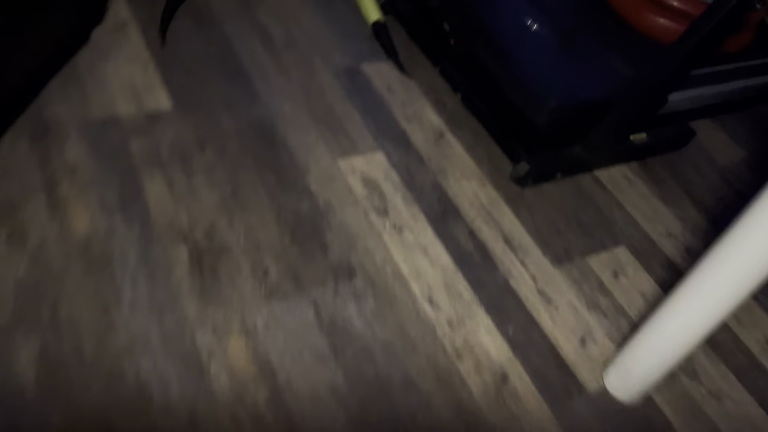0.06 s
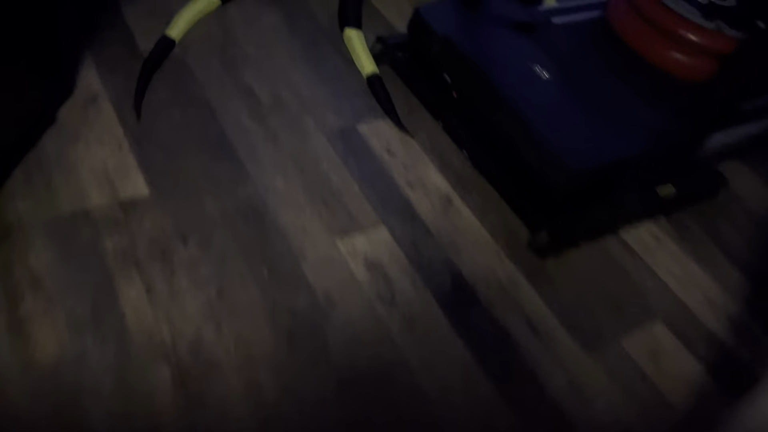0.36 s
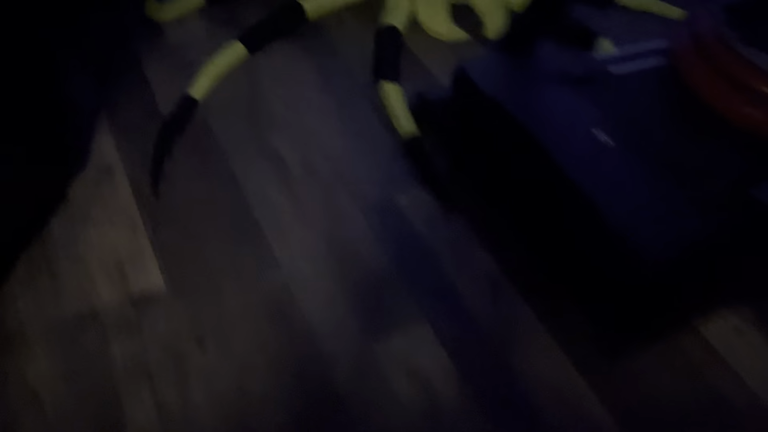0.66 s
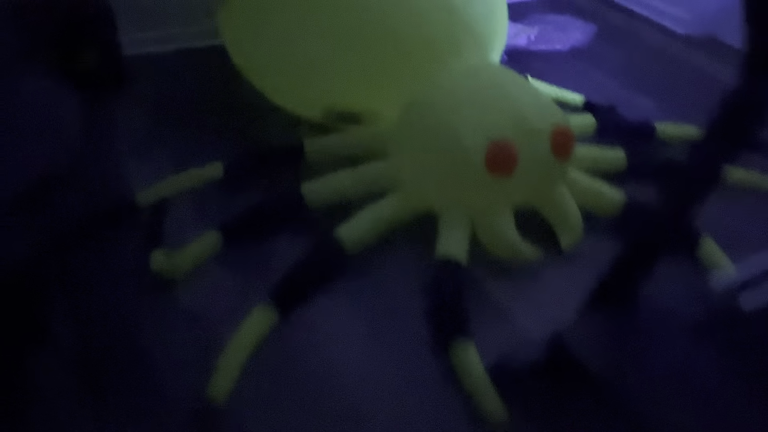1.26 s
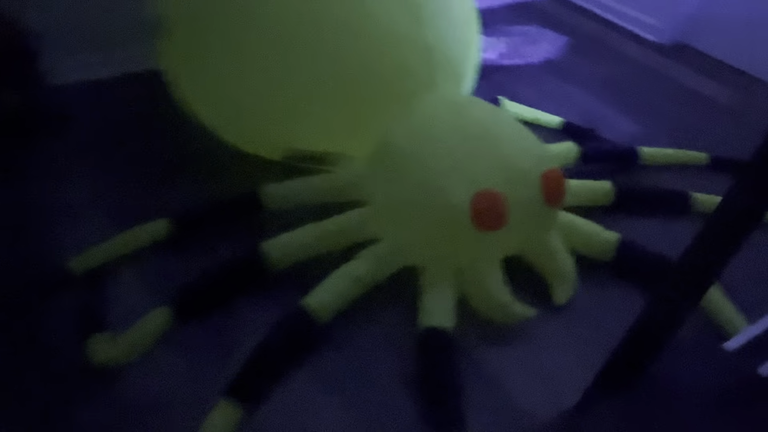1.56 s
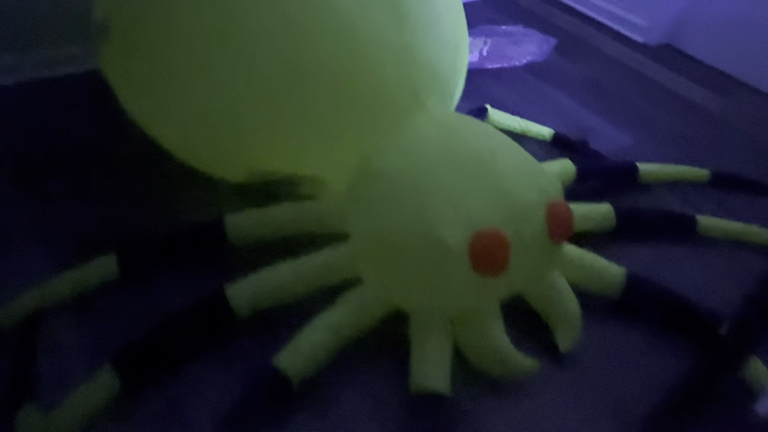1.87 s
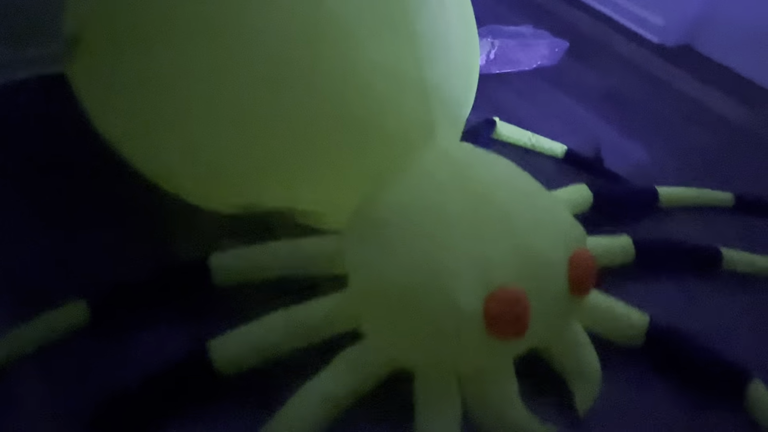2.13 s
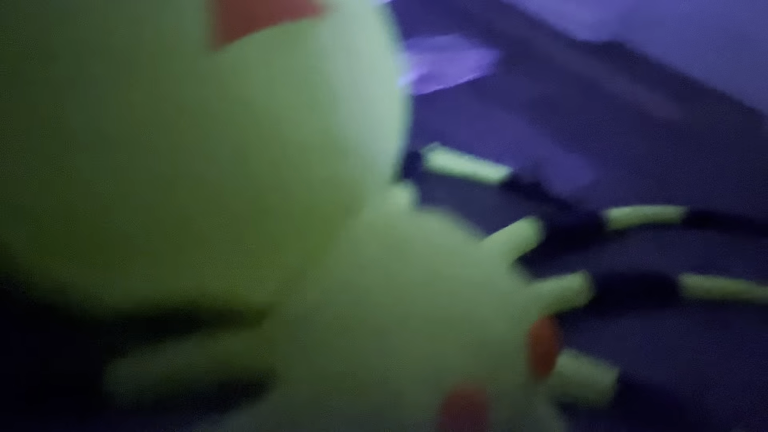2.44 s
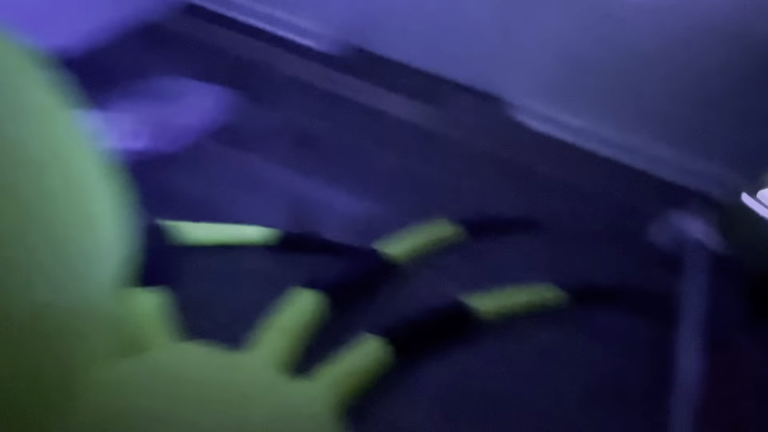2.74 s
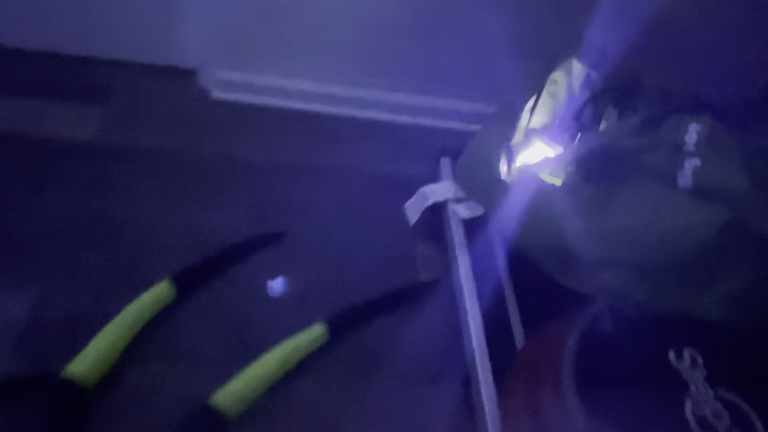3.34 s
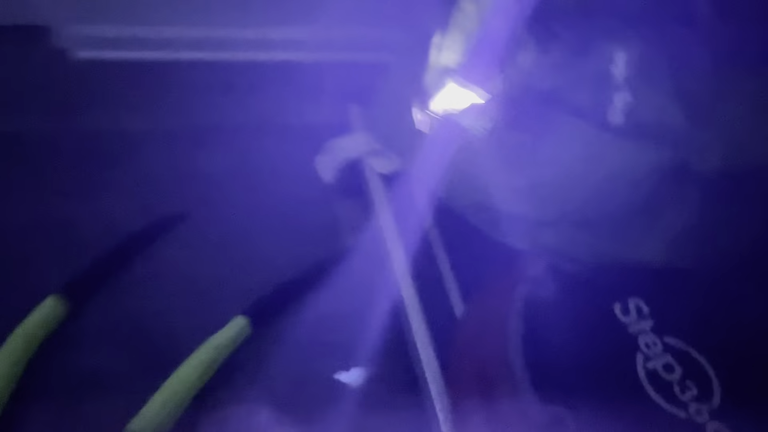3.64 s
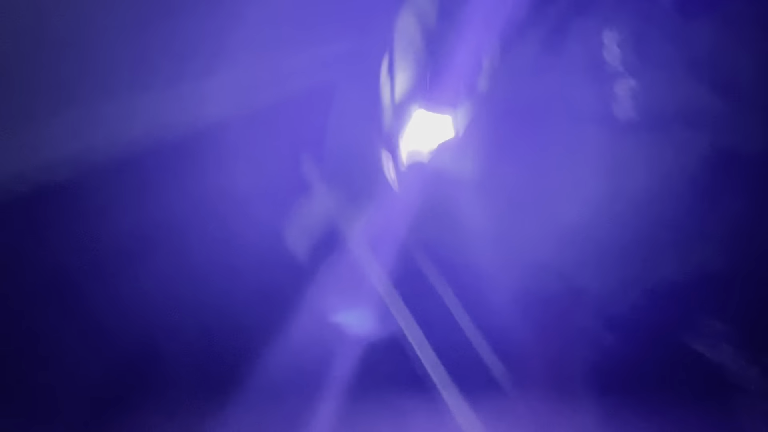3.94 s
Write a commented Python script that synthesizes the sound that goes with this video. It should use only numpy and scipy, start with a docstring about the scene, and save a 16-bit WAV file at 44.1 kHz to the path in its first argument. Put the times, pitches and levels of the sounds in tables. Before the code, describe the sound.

A small blower whirs throughout, with rushing air and a faint wavering whine, growing slightly louder as the microphone approaches in a small room. Soft heel thuds open it, and a low motor hum fades by about 2.5 seconds. Light plank knocks come at 1.8 and 2.4 seconds, with faint cloth swishes around 2.5 and 3. Two loud footstep knocks land at about 3.1 and 3.9 seconds.

```python
"""Walking up to a small blower

A blower keeps an inflatable decoration filled: air rushes through its hollow housing and makes it
whirr, over shaft tones and a faint whine. The microphone is carried toward it across a plank floor,
away from a low motor hum. Planks knock underfoot, heels thud and cloth swishes in the small room."""
import sys
import numpy as np
from scipy import signal
from scipy.fft import rfft, irfft
from scipy.io import wavfile
from scipy.ndimage import uniform_filter1d

SR = 44100
rng = np.random.default_rng(int(sys.argv[2]) if len(sys.argv) > 2 else 0)


def unload_audio(sound):
    """Save the sound as a 16-bit wav file, at the path given as the first command line argument."""
    columns = np.transpose(np.atleast_2d(sound))
    # keep every value between -1 and 1, then stretch to whole-number steps
    steps = np.round(np.clip(columns, -1, 1) * 32767)
    wavfile.write(sys.argv[1], SR, steps.astype(np.int16))


N = 176400  # 4 seconds


# The tone colour of the rushing air as the microphone picks it up, with a dip near 8400 Hz.
# Each row: frequency in Hz, relative strength in dB.
AIR_AT_MIC = [(20, -34), (30, -15), (40, 5), (62, 13), (90, 4.5), (115, 0), (170, -0.5), (220, -1),
              (330, 1.5), (430, -2), (650, 1), (950, 4), (1400, -4.5), (1950, -2), (2350, -10.5),
              (2850, -6.5), (3250, -10.5), (3900, -8.5), (5500, -15.5), (7000, -21.5), (8400, -48.5),
              (10500, -25), (14500, -41)]
# Air and whine grow louder nearer the blower. Each row: time in seconds, gain in dB.
NEARNESS = [(0, -2), (.9, -1.5), (1.5, -0.5), (2.2, -0.2), (2.9, 2.25), (3.4, 1.35), (4, 0.3)]
# Extra hiss above about 7000 Hz. Each row: time in seconds, gain in dB.
TREBLE_GAIN = [(0, 1.5), (2, 4), (2.55, 4), (3.3, 2.5), (4, 2.5)]

def rushing_air(level_db=-42.5, swell_db=1.1, flicker_db=1.09):
    """Swirling air makes noise, in half-octave bands that swell together and flicker alone."""
    hz, out = frequencies(), 0
    balance = at_hz(STEREO, hz, column=2)
    rush = rfft(stereo_noise(AIR_AT_MIC)) * undb(np.array([balance, -balance]) / 2)
    near, treble = curve(NEARNESS), curve(TREBLE_GAIN)
    swell = -swell_db * wander(2.65)
    for centre in 20 * 2 ** (np.arange(20) / 2):
        band = np.maximum(1 - 2 * abs(np.log2((hz + 1) / centre)), 0)
        db = near * (centre > 250) + treble * (centre > 7000)
        out = out + irfft(rush * band, N) * undb(db + swell + flicker_db * wander(14))
    return out * undb(level_db)


# The notes of the housing. Each row: pitch in Hz, half width in Hz, relative strength in dB.
HOUSING_NOTES = [(728, 39, -16.5), (872, 17, -5), (981.5, 14, -4), (1042.5, 216, -8.5), (1880, 43, -17),
                 (2924, 320, -23)]
# The low notes sing out in turn. Each row: pitch in Hz, peak time and spread in seconds, gain in dB.
HOUSING_SWELLS = [(720, .62, .25, 12), (872, 1.46, .13, 8), (872, 2.55, .08, 5), (982, 1.3, .09, 7),
                  (982, 2.35, .25, 4)]
# How loud the whole whirr is. Each row: time in seconds, level in dB.
WHIRR_LEVEL = [(0, -45), (.7, -52.5), (1.4, -48.5), (2.1, -45), (2.8, -50), (3.3, -55), (4, -47.5)]

def housing_whirr(pitch_wander=.011):
    """Air rings the hollow housing; each note wavers in pitch and level on its own."""
    hz, out = frequencies(), 0
    for centre, width, db in HOUSING_NOTES:
        peak = 1 / (1 + ((hz - centre) / width) ** 2)
        band = irfft(rfft(rng.standard_normal((2, N))) * peak, N)
        drift = np.exp(2j * np.pi * np.cumsum(centre * pitch_wander * wander(5)) / SR)
        note = (signal.hilbert(band) * drift).real  # slides the band up and down in pitch
        out = out + note * undb(db + swells(HOUSING_SWELLS, centre) + 1.2 * wander(6))
    return unit(out) * undb(curve(WHIRR_LEVEL))


# The shaft and blade tones change as the microphone moves. Each row: time in seconds, level in dB.
SHAFT_LEVEL = [(0, -53), (.7, -48), (1.05, -62), (1.4, -59), (2.05, -46), (4, -50)]
BLADE_LEVEL = [(0, -54), (.65, -59), (1.05, -47), (1.6, -51.5), (2.25, -49), (2.65, -45), (3.05, -52),
               (3.35, -57.5), (4, -50)]
# The whine's tones: their pitches as multiples of the shaft's, then their base levels in dB.
WHINE_MULTIPLES = [3, 28, 32, 36, 40, 42, 44, 50]
WHINE_DB = [-58, -70, -65.3, -72.5, -70.5, -69.5, -72, -69.3]
# Two of them swell in turn. Each row: multiple, peak time and spread in seconds, gain in dB.
WHINE_SWELLS = [(32, 1.72, .13, 7), (32, 2.05, .1, 5), (32, 3.24, .07, 7), (50, .42, .12, 7),
                (50, 1.15, .1, 5), (50, 2.05, .08, 5), (50, 2.84, .08, 9)]

def blower_tones(shaft_hz=68.45, speed_wander=.0006, blades=4, fade_db=2.5):
    """The spinning shaft and blades drone; thin overtones fade in and out at each ear as a whine."""
    angle = 2 * np.pi * np.cumsum(shaft_hz * (1 + speed_wander * wander(5))) / SR
    shaft = undb(curve(SHAFT_LEVEL)) * np.sin(angle)
    blade = undb(curve(BLADE_LEVEL) + 1.6 * wander(16)) * np.sin(blades * angle + .3 * wander(20))
    whine = np.zeros((2, N))
    for multiple, db in zip(WHINE_MULTIPLES, WHINE_DB):
        unsteady = min(multiple / 20, 1)  # the lowest tone wavers least
        level = db + curve(NEARNESS) + swells(WHINE_SWELLS, multiple)
        for ear in range(2):
            fade = unsteady * fade_db * (wander(5.8) + 1)
            wobble = unsteady * (.7 * wander(5) + .25 * wander(30))
            whine[ear] += undb(level + fade) * np.sin(multiple * angle + wobble)
    return np.sqrt(2) * (shaft + blade + whine)


# Paths the blower's sound bounces along. Each row: rough delay in ms, its drift in ms per second.
BOUNCES = [(4.3, 1.3), (7.1, .8), (12.5, 1.7), (19, -1.5)]

def with_bounces(sound, bounce_db=-12):
    """Walls and floor add late copies that shift as the microphone moves, so hollow bands slide by."""
    t, out = clock(), sound
    bright = filtered(sound, [500, 5000], "band")
    for delay, drift in BOUNCES:
        lags = (delay + drift * t + rng.uniform(-.5, .5, (2, 1))) / 1000
        copies = np.array([np.interp(t - lag, t, ear) for lag, ear in zip(lags, bright)])
        out = out + undb(bounce_db) * copies
    return out


# Knocks underfoot. Each row: start in seconds, level in dB, ring pitch in Hz,
# then gains in dB for the body note, for the crack and snap, and for the room's echo.
KNOCKS = [(.266, -40, 480, -5, -20, -21), (1.7795, -30, 583, -10, -13, -13),
          (2.3664, -28, 568, -10.5, -22, 1.5), (3.0543, -7, 562, -16, -11.5, -3),
          (3.8710, -11, 539, -15, -16.5, -7), (3.8842, -28, 560, -7, -26, -14)]
# The snap of first contact. Each row: pitch in Hz, rise time in seconds, gain in dB.
SNAP_NOTES = [(930, .0016, -5), (1420, .0008, -3.5), (2700, .00025, -7), (5000, .0001, -10)]
# Board notes that linger. Each row: pitch in Hz, dB relative to the ring, seconds to fade by 60 dB.
BOARD_NOTES = [(479, -28, .35), (587, -30, .38), (940, -37, .35)]
# The first echoes off the walls. Each row: delay in seconds, gain in dB.
WALL_ECHOES = [(.0145, -22), (.0292, -15), (.0545, -19)]

def plank_knocks(rise_s=.0025, glide=.7, body_ratio=.594, crack_s=.0006):
    """A plank underfoot cracks, snaps and rings over a lower body note; boards linger, walls echo."""
    t, direct, to_room, boards = clock(), 0, 0, 0
    for start, db, hz, body_db, crack_db, room_db in KNOCKS:
        age = np.maximum(t - start, 0)
        grit = rng.standard_normal(N) * (t > start) * np.exp(-age / crack_s)
        crack = filtered(grit, 2500, "low")
        snap = sum(undb(gain) * ring(start, pitch, rise) for pitch, rise, gain in SNAP_NOTES)
        hollow = ring(start, hz, rise_s, glide)
        body = ring(start, hz * body_ratio, rise_s / body_ratio, glide)
        knock = undb(db) * (hollow + undb(body_db) * body + undb(crack_db) * (crack + snap))
        for pitch, gain, fade_s in BOARD_NOTES:
            level = db + gain - 60 * age / fade_s + 3 * wander(120)
            boards = boards + undb(level) * np.sin(2 * np.pi * pitch * age)
        direct = direct + knock
        to_room = to_room + undb(room_db) * knock
    echoes = sum(undb(db) * np.interp(t - lag, t, direct) for lag, db in WALL_ECHOES)
    return direct + boards + echoes + room_echo(to_room)


def ring(start, hz, rise_s, glide=0, glide_s=.0012):
    """A bent plank rings for a few cycles; with glide, its higher waves arrive first."""
    age = np.maximum(clock() - start, 0)
    cycles = hz * (age + glide * glide_s * (1 - np.exp(-age / glide_s)))
    loudness = (age / rise_s * np.exp(1 - age / rise_s)) ** 1.7
    return -np.sin(2 * np.pi * cycles) * loudness


# Heels landing. Each row: start in seconds, peak level in dB, pitch in Hz.
THUDS = [(.002, -35.5, 111), (0.039, -29, 174), (0.062, -29, 117), (.068, -29, 215), (.108, -31, 66),
         (1.6, -44, 165), (2.371, -39, 225), (3.873, -20, 205), (3.882, -31, 110), (3.954, -31, 230)]

def heel_thuds(rise_s=.005, room_db=-6.5):
    """Heels hit the floor with soft, low thuds that boom in the room."""
    thuds = sum(undb(db) * ring(start, hz, rise_s) for start, db, hz in THUDS)
    return thuds + undb(room_db) * room_echo(thuds)


# Swishes of cloth. Each row: peak time and spread in seconds, level in dB,
# left minus right in dB, gain in dB above about 8000 Hz.
SWISHES = [(2.505, 0.025, -42, 7.5, -20), (3.025, 0.029, -42, 1, -1), (3.09, .028, -39, 3.5, -4),
           (3.879, 0.006, -41, 1, -3)]
# The tone colour of cloth as the microphone picks it up, with a dip near 8400 Hz.
# Each row: frequency in Hz, relative strength in dB.
CLOTH_AT_MIC = [(300, 9.5), (1500, 1), (3000, 1.5), (5500, -2), (8400, -14), (11500, -7.5), (15000, -15)]

def cloth_swishes():
    """Fabric rubs in short, grainy bursts of noise, some brighter than others."""
    out = 0
    rub = stereo_noise(CLOTH_AT_MIC) * undb(1.5 * wander(250))
    treble = irfft(rfft(rub) * np.clip((frequencies() - 7500) / 1500, 0, 1), N)
    for when, spread, db, pan, treble_db in SWISHES:
        swish = rub + (undb(treble_db) - 1) * treble
        out = out + swish * undb(db + np.array([[pan], [-pan]]) / 2) * bump(when, spread)
    return out


# The motor hum fades as the microphone leaves it. Each row: time in seconds, level in dB.
HUM_LEVEL = [(0, -43.5), (.8, -44), (1, -36.5), (1.2, -43.5), (2, -46), (2.7, -106), (4, -69)]

def motor_hum(motor_hz=59.15, mains_hz=120, mains_db=-56.5):
    """A motor hums low, and mains electricity adds a wavering tone elsewhere in the room."""
    angle = 2 * np.pi * clock()
    motor = undb(curve(HUM_LEVEL)) * -np.cos(motor_hz * angle)
    mains = undb(mains_db + 3 * wander(4)) * np.sin(mains_hz * angle)
    return np.sqrt(2) * (motor + mains)


# The tone colour of the room's echo. Each row: frequency in Hz, relative strength in dB.
ROOM_COLOUR = [(80, 13), (300, 7), (600, -3.5), (1200, 13.5), (3000, -16), (12000, 5.5)]

def room_echo(sound, fade_s=.46):
    """Many reflections in the small room blur into a tail that drops 60 dB in fade_s."""
    t = clock()
    tail = stereo_noise(ROOM_COLOUR) * undb(-60 * t / fade_s) * np.clip(t / .008 - .5, 0, 1)
    tail /= np.sqrt(np.sum(tail ** 2) / 2)
    return signal.fftconvolve(sound[None], tail, axes=1)[:, :N]


# How the two ears compare. Each row: frequency in Hz, likeness (1 same, 0 unrelated, -1 opposite),
# left minus right in dB (for the rushing air only).
STEREO = [(60, 0.97, -2), (312, 0.78, -1.5), (636, 0.58, 0.5), (1300, 0, -0.5), (2140, 0.96, 2.5),
          (3340, 0.43, 4), (5450, 0.25, 10), (6850, 0, -1), (8900, -.85, 16), (11800, 1, -9),
          (13900, 0.1, 7)]

def stereo_noise(colour):
    """Noise of a given tone colour, nearly the same at both ears in the bass."""
    hz = frequencies()
    like = np.clip(at_hz(STEREO, hz), -.99, .99)
    mid, side = rfft(rng.standard_normal((2, N)))
    pair = mid * np.sqrt(1 + like) + np.array([[1], [-1]]) * side * np.sqrt(1 - like)
    return unit(irfft(pair * undb(at_hz(colour, hz)), N))


def swells(rows, tone):
    """A tone's rise and fall in dB, from the rows within 6% of its pitch."""
    return sum(db * bump(when, spread) for pitch, when, spread, db in rows
               if abs(pitch / tone - 1) < .06)


def bump(when, spread):
    """A smooth, bell-shaped rise to 1 and back."""
    return np.exp(-((clock() - when) / spread) ** 2 / 2)


def wander(rate):
    """Smooth random drift of size about 1, with rate new values a second."""
    hold = int(SR / rate)
    steps = np.repeat(rng.standard_normal(N // hold + 1), hold)
    return unit(uniform_filter1d(uniform_filter1d(steps, hold), hold)[:N])


def curve(rows):
    """Straight lines through (seconds, value) rows."""
    return np.interp(clock(), *np.array(rows, float).T)


def at_hz(rows, hz, column=1):
    """Read a table's column between its rows, with octaves evenly spaced."""
    rows = np.array(rows, float)
    return np.interp(np.log(hz + 1), np.log(rows[:, 0]), rows[:, column])


def filtered(sound, hz, keep):
    """Keep the lows, the highs or a band between."""
    return signal.sosfilt(signal.butter(2, hz, keep, fs=SR, output="sos"), sound)


def undb(db):
    return 10 ** (np.asarray(db) / 20)


def unit(x):
    """Scale to an average power of 1."""
    return x / np.sqrt(np.mean(x ** 2))


def clock():
    return np.arange(N) / SR


def frequencies():
    return np.arange(N // 2 + 1) * SR / N


def scene():
    """The blower, the hum and the sounds of walking, heard together."""
    blower = with_bounces(rushing_air() + housing_whirr()) + blower_tones()
    return blower + motor_hum() + plank_knocks() + heel_thuds() + cloth_swishes()


def record(dry, low_hz=28, top_hz=14300):
    """The recorder cuts the deepest rumble and the highest hiss."""
    dry = filtered(dry, low_hz, "high")
    return signal.sosfilt(signal.ellip(8, .2, 70, top_hz, fs=SR, output="sos"), dry)


dry = scene()
out = record(dry)
unload_audio(out)
```